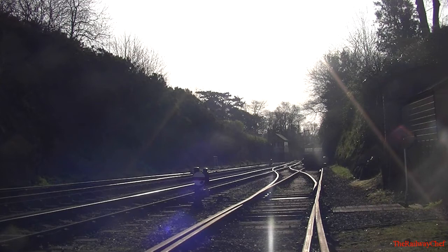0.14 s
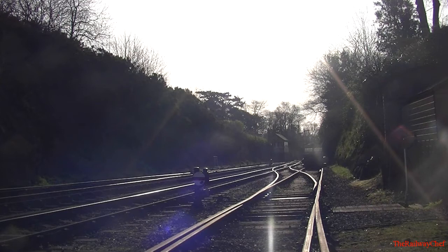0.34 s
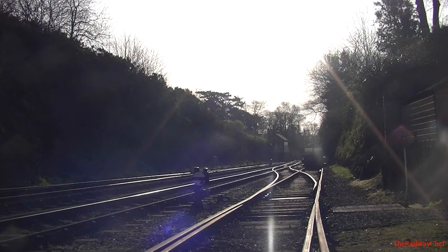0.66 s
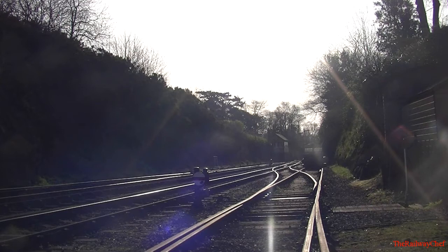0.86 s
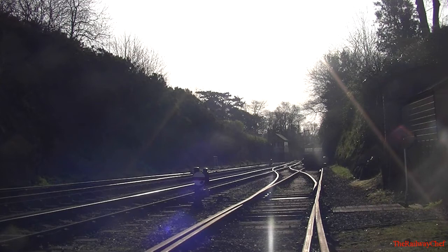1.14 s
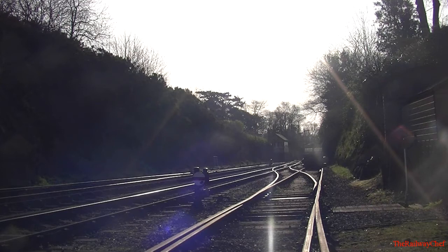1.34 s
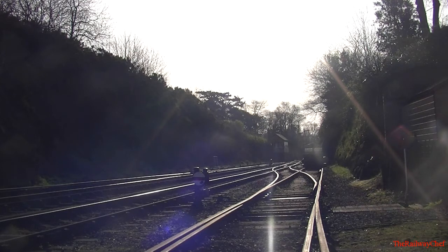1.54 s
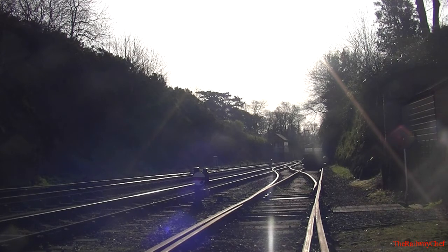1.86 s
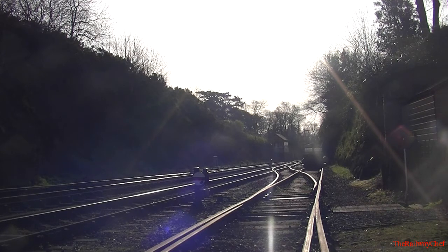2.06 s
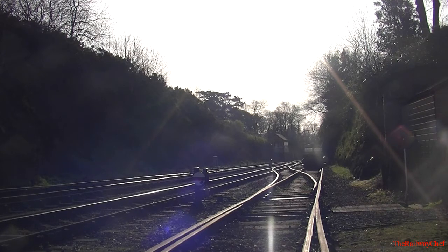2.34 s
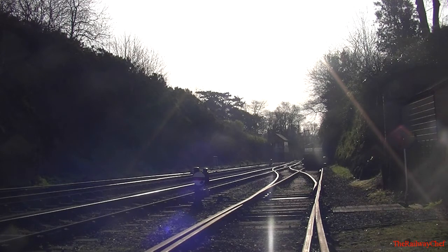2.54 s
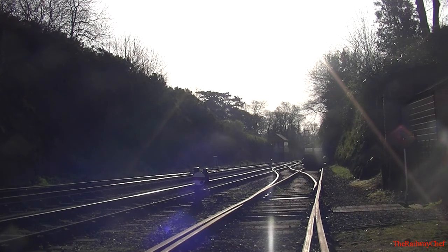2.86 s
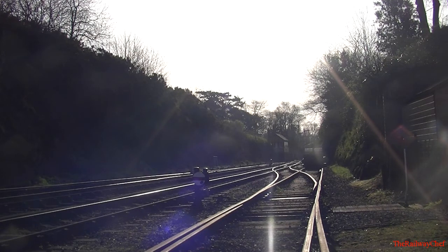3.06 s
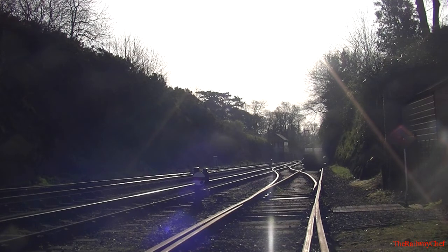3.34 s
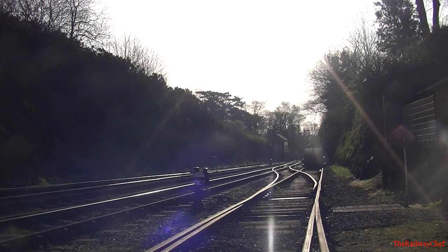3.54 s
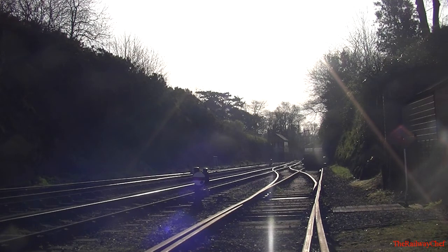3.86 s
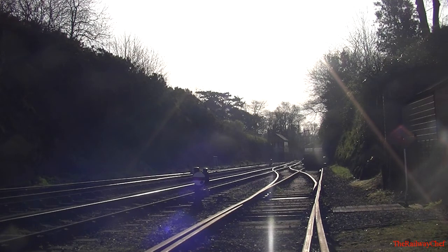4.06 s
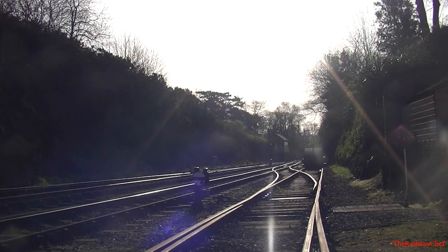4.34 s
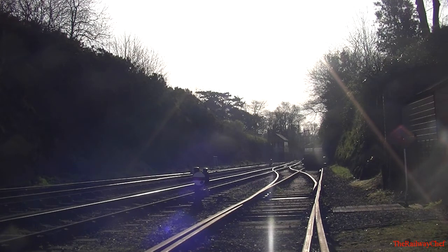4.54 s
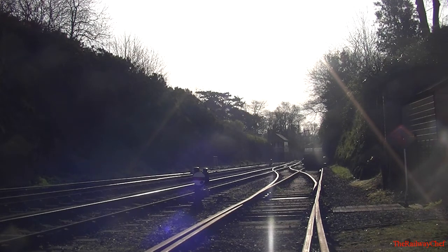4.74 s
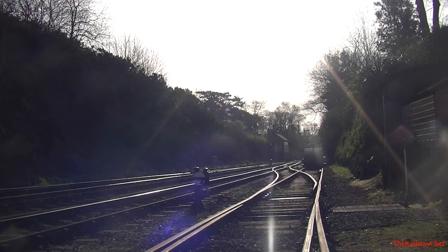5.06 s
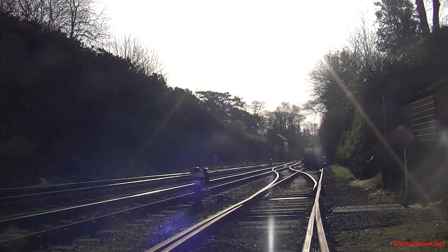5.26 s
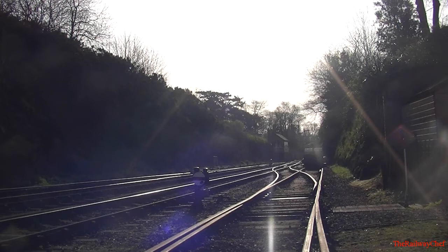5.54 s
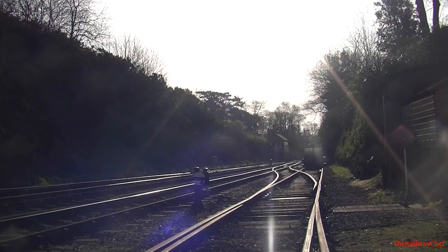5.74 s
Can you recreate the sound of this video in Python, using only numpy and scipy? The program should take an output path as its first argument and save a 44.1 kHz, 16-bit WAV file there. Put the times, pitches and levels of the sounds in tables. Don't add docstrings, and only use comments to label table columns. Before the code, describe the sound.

Harsh bright jets of steam blow, cut off and snap back as a starting steam engine chuffs heavily in a wooded cutting.

```python
import sys
import numpy as np
from scipy import signal
from scipy.fft import rfft, irfft
from scipy.io import wavfile
from scipy.ndimage import uniform_filter1d

SR = 44100
rng = np.random.default_rng(int(sys.argv[2]) if len(sys.argv) > 2 else 0)


def elevation(decibels):
    levels = np.asarray(decibels, float)
    return 10 ** (levels / 20)


def master(y):
    cut = np.clip(np.atleast_2d(y).T, -1, 1)
    pcm = np.round(cut * 32767)
    wavfile.write(sys.argv[1], SR, pcm.astype(np.int16))


N = 260190
SIZE, HOP = 1024, 256
HZ = np.fft.rfftfreq(SIZE, 1 / SR)[:, None]
T = np.arange(N) / SR
SLOW = T[::32]

# f/Hz, left-right level/dB
PORT_LEAN = [(60, 1.0), (110, 3.5), (200, 1), (380, 2), (700, 4.5), (1290, 8), (2380, 0), (4400, 4),
             (8120, 9), (15000, 5)]
# f/Hz, share/1
PORT_COHERENCE = [(30, 0.6), (150, 0.03), (800, 0.57), (2500, 0.39), (7000, 0.66), (12000, 0.22),
                  (16000, 0.6)]
# f/Hz, phase/rad
PORT_LEAD = [(100, 2.6), (1000, 3.5), (2500, 3.97), (6000, 4.46), (12000, 3.8), (16000, 2.7)]
# t/s, delay/us
ROLLING_LEAD = [(0, .1), (2.5, .1), (4, 11), (5.2, 16), (5.9, 45)]

# f/Hz, level/dB per Hz
WASH_COLOUR = [(18, -60), (30, -27), (108, -11.5), (230, -21.5), (332, -17), (532, -10.5), (830, -3),
               (1470, 1.5), (2550, -2.5), (3150, -3), (9430, -6.5), (11600, -13), (15500, -24)]
# f/Hz, share/1
WASH_COHERENCE = [(30, 0.5), (100, 0.27), (300, 0.53), (1000, 0.34), (3000, 0), (12000, 0.3)]
# f/Hz, loss/dB
WASH_RIGHT_LOSS = [(40, 2.0), (200, 4.5), (9000, 8.5)]
WASH_DB = -37
WASH_FOLLOWS, WASH_LAG_S = 0.14, 0.28
NEARING_DB_PER_S = 0.55
# delay t/s, level/dB
BANK_ECHOES = [(.0193, -19), (.027, -19), (.041, -19), (.058, -19), (.083, -20)]

# start t/s, rise t/s, hold t/s, level/dB
GROANS = [
    (0.241, 0.089, 0.13, -54),
    (.56, 0.071, .14, -58),
    (.84, .05, 0.37, -62.5),
    (1.95, 0.089, 0.34, -58.5),
    (3.078, 0.052, 0.078, -55),
    (3.42, 0.027, 0.27, -54.5),
    (3.948, 0.045, 0.074, -62),
    (4.719, 0.13, 0.15, -56),
    (5.22, 0.06, .06, -61),
    (5.62, 0.045, 0.14, -61.5),
]
# f/Hz, level/dB
GROAN_COLOUR = [(60, -24), (120, 0), (180, 0.5), (300, 1), (450, -1), (900, -35), (4000, -70)]

# start t/s, rise t/s, hold t/s, boom level/dB, rasp level/dB
EXHAUST_BEATS = [
    (-0.12, 0.32, 0.067, -39.5, -25.5),
    (1.775, .025, 0.058, -38, -27.5),
    (2.572, 0.32, 0.15, -39.5, -28.5),
    (3.408, 0.079, 0.091, -37, -30),
    (4.974, 0.038, 0.097, -38, -31),
    (5.68, 0.21, .1, -41.5, -27),
]
# start t/s, rise t/s, hold t/s, rasp level/dB
AFTERBLOWS = [
    (0.292, .1, 0.096, -33.5),
    (3.11, 0.052, 0.33, -30),
    (3.51, .08, .1, -30),
    (4.45, .15, 0.023, -33.5),
    (4.998, .012, 0.018, -27),
    (5.118, .05, 0.018, -32),
    (5.203, 0.06, .04, -33.5),
]
# f/Hz, level/dB
BOOM_COLOUR = [(60, -45), (150, -21), (240, -8), (450, -2.5), (800, -1), (1200, -0.5), (2500, -15),
               (8000, -63)]
# f/Hz, level/dB
RASP_COLOUR = [(400, -27), (800, -8.5), (1200, -1.5), (1700, 2.5), (2300, -4.5), (3500, -9.5), (9000, -46)]
# t/s, pitch factor/1
OPENING_PITCH = [(0, .92), (1.8, 0.98), (2.75, 1), (3.05, 0.63), (3.45, 0.91), (3.75, 0.69), (5, 0.8),
                 (5.15, 0.81), (5.26, 0.8), (5.42, 0.84), (5.9, 0.77)]
BOOM_FALL_DB_PER_S, RASP_FALL_DB_PER_S, RASP_LINGER_S, RISE_BEND = 82, 80, 0.057, 2.26
CRACK_DB, CRACK_S, QUICK_S = 4.5, 0.034, 0.052
BOOM_REST_DB, BOOM_UNDER_JET_DB, RASP_UNDER_JET_DB = -54, -27, -6.5
ROLL_DB, ROLL_FALL_DB_PER_S = -20.5, 34
CLIMB, CLIMB_S, SETTLE_S = 0.28, 0.27, 1

# t/s, f/Hz, level over the jet/dB
COCK_MODE = [(0, 9400, -30), (1.76, 9400, -30), (1.81, 8800, -4), (1.92, 8900, -10), (2.5, 8950, -7.5),
             (2.8, 9600, -34), (5.9, 9600, -35)]
# t/s, f/Hz, width/Hz, level over the jet/dB
HOLLOW_MODE = [(0, 2950, 285, 0.5), (.15, 3010, 296, 4.5), (.28, 3070, 400, -7.5), (.45, 3030, 600, -4),
               (.7, 3030, 400, -3.5), (.95, 3040, 250, -6), (1.5, 3040, 174, 0), (1.8, 3090, 200, -7),
               (1.87, 3080, 220, -2), (2.2, 3030, 230, -6), (2.6, 3070, 230, -5), (2.9, 3100, 500, -10.5),
               (3.37, 3084, 1120, -6.5), (3.55, 3240, 457, -8.5), (3.75, 3300, 300, -5),
               (4.1, 3350, 344.3, -7), (4.6, 3660, 450, -13), (5.9, 3840, 700, -13)]
OVERTONE, OVERTONE_WIDTH_HZ = 2.03, 600
OVERTONE_DB, OVERTONE_BY_COCK = -10.5, 0.12

# open t/s, length t/s, first level/dB, last level/dB, treble tilt/dB
STROKE_BLOWS = [
    (-0.3, 1.682, -28.5, -31, 2),
    (1.786, 0.78, -28, -33, 3),
    (2.747, .3, -30, -30, 0.5),
    (3.081, 1.544, -29, -30.5, 4),
    (4.987, 0.77, -27.5, -30.5, 6),
    (5.82, .3, -30, -30, 2),
]
# t/s, level/dB, length t/s
SLUGS = [(.12, -1.5, 0.54), (0.463, 2.5, 0.35), (0.907, -1, .3), (1.218, 1.4, 0.15), (0.782, -1.8, 0.091),
         (1.8, 4, .05), (2.33, 0, .15), (3.364, -0.5, 0.19), (3.625, -1.8, 0.17), (3.704, 1.5, 0.16),
         (4.086, -1.3, 0.063), (4.167, 1.8, 0.048), (4.351, -1.5, 0.19), (4.484, 0.2, 0.15),
         (4.656, 1.5, 0.085), (5.18, 1, 0.031), (5.193, -3.5, .025), (5.224, 1.5, .04)]
# f/Hz, level/dB per Hz
JET_COLOUR = [(180, -88), (300, -21), (527, -38.5), (592, -18), (722, -28.5), (824, -14.5), (1020, -21),
              (1790, -4), (2670, -3), (2950, -2.5), (3840, -2.5), (10000, -11.5), (13500, -18),
              (15700, -25)]
# t/s, left-right level/dB
JET_LEAN = [(0, 5), (.5, 5.5), (1.2, 8), (3, 8), (4.4, 7.5), (5.2, 6.5), (5.9, 3.5)]
# t/s, share/1
BALLAST_ECHO = [(0, 0.042), (1.7, 0.016), (1.85, 0.12), (2.5, 0.079), (2.8, 0.013), (5.9, 0.057)]
BALLAST_HZ = 5200
SNAP_S, SWELL_S, SWELL_DB, SHUT_DB_PER_S = 0.021, 0.17, -7, 62
SHUT_DULL_DB, SHUT_LEAN_DB, SHUT_DEPTH_DB = -9.5, -8.5, 9
SAG_DULL_DB, SAG_DULL_S, OPEN_DULL_DB = -2, 0.14, -2


def evened(x):
    return x / np.sqrt(np.mean(x ** 2) + 1e-20)


def read(points, hz):
    f, value = np.transpose(points)
    return np.interp(np.log(hz + 1), np.log(f + 1), value)


def column(table, t, order):
    rows = np.transpose(table)
    return np.interp(t, rows[0], rows[order])


def fine(control):
    return np.interp(T, SLOW, control)


def turbulence(crackle, flutter_db):
    g, eddies = rng.standard_normal((2, 2, N))
    eddies = evened(0.86 * g + uniform_filter1d(eddies, size=3) + uniform_filter1d(g, size=3))
    spikes = g - crackle * (np.minimum(eddies ** 2, 6.5) - 1)
    flutter = uniform_filter1d(rng.standard_normal(N), 900)
    flutter = evened(uniform_filter1d(flutter, 900))
    return evened(spikes) * elevation(flutter_db * flutter)


def heard(pair, colour_db, lean_db, patchy_db, band_hz, lead=None):
    _, t, (a, b) = signal.stft(pair, SR, nperseg=SIZE, noverlap=SIZE - HOP)
    patches = uniform_filter1d(rng.standard_normal(a.shape), 9, 0)
    patches = evened(uniform_filter1d(patches, 18, 1))
    if lead is None:
        rolling_s = column(ROLLING_LEAD, t, order=1) / 10 ** 6
        lead = read(PORT_LEAD, HZ) + 2 * np.pi * HZ * rolling_s
    share = np.clip(read(PORT_COHERENCE, HZ), 0, 1)
    right = share * np.exp(-1j * lead) * a + np.sqrt(1 - share ** 2) * b
    z = np.array([a * elevation(lean_db(t) / 2), right * elevation(-lean_db(t) / 2)])
    in_band = (HZ[:, 0] > band_hz[0]) & (HZ[:, 0] < band_hz[1])
    still = (z.mean(0) * elevation(colour_db(t[:1])))[in_band]
    rms = np.sqrt(4 / 3 * np.mean(np.sum(abs(still) ** 2, 0)))
    z = z * elevation(colour_db(t) + patchy_db * patches)
    return signal.istft(z, SR, nperseg=SIZE, noverlap=SIZE - HOP)[1][:, :N] / rms


def puff(start, rise, hold, db, fall_db_per_s):
    age = SLOW - start
    late = np.maximum(age - rise, 0)
    crack_db = CRACK_DB * np.exp(-(rise / QUICK_S) ** 4 - late / CRACK_S)
    fall_db = fall_db_per_s * np.maximum(late - hold, 0)
    return elevation(2 * (db + crack_db - fall_db)) * np.clip(age / rise, 0, 1) ** RISE_BEND


def wash():
    pair = rng.standard_normal((2, N))
    hz = np.fft.rfftfreq(N, 1 / SR)
    a, b = rfft(pair) * elevation(read(WASH_COLOUR, hz))
    share = np.clip(read(WASH_COHERENCE, hz), 0, 1)
    right = np.sqrt(1 - share ** 2) * b - share * a
    right = right * elevation(-read(WASH_RIGHT_LOSS, hz))
    both = irfft(np.array([a, right]), N)
    return elevation(WASH_DB) * both / np.std(both.mean(0))


def cutting(x):
    taps = np.zeros(SR // 10)
    taps[0] = 1
    for s, db in BANK_ECHOES:
        taps[round(s * SR)] = elevation(db)
    return signal.oaconvolve(x, taps[None] / np.linalg.norm(taps), axes=1)[:, :N]


def rumble():
    colour = lambda t: read(GROAN_COLOUR, HZ) + 0 * t
    lean = lambda t: 3.8 + 0 * t
    groan = heard(turbulence(0, 0.66), colour, lean, 0.51, [120, 300])
    power = sum(puff(*row, BOOM_FALL_DB_PER_S) for row in GROANS)
    return groan * fine(np.sqrt(power))


def draught(t):
    age = t - np.transpose(EXHAUST_BEATS)[0][:, None]
    age = np.where(age > 0, age, np.inf).min(0)
    climb = CLIMB * (1 - np.exp(-age / CLIMB_S)) * np.exp(-age / SETTLE_S)
    return column(OPENING_PITCH, t, order=1) * (1 + climb)


def chimney(jet_db):
    boom_colour = lambda t: read(BOOM_COLOUR, HZ) + 0 * t
    rasp_colour = lambda t: read(RASP_COLOUR, HZ / draught(t))
    boom_lean = lambda t: 5.5 + 0 * t
    rasp_lean = lambda t: 6.7 + 0 * t
    boom = heard(turbulence(0.39, 0.17), boom_colour, boom_lean, 0.21, [200, 700])
    rasp = heard(turbulence(0.6, 0.62), rasp_colour, rasp_lean, 0.51, [1100, 2200])
    low = elevation(2 * (BOOM_REST_DB + NEARING_DB_PER_S * SLOW)) + elevation(2 * (jet_db + BOOM_UNDER_JET_DB))
    high = elevation(2 * (jet_db + RASP_UNDER_JET_DB))
    for start, rise, hold, boom_db, rasp_db in EXHAUST_BEATS:
        low = low + puff(start, rise, hold, boom_db, BOOM_FALL_DB_PER_S)
        low = low + puff(start, rise, hold, boom_db + ROLL_DB, ROLL_FALL_DB_PER_S)
        high = high + puff(start, rise, hold + RASP_LINGER_S, rasp_db, RASP_FALL_DB_PER_S)
    for row in AFTERBLOWS:
        high = high + puff(*row, RASP_FALL_DB_PER_S)
    return (boom * fine(np.sqrt(low)) + rasp * fine(np.sqrt(high))) * elevation(-3.5)


def cock():
    colour = lambda t: -20 * np.log10(1 + (2 * (HZ - column(COCK_MODE, t, order=1)) / 1200) ** 2)
    lean = lambda t: 13.0 + 0 * t
    song = heard(turbulence(.1, .5), colour, lean, .9, [7000, 12000])
    return song * elevation(column(COCK_MODE, T, order=2))


def hollow():
    def colour(t):
        pitch = column(HOLLOW_MODE, t, order=1)
        width = column(HOLLOW_MODE, t, order=2)
        first = 1 / (1 + (2 * (HZ - pitch) / width) ** 2) ** 2
        second = 1 / (1 + (2 * (HZ - OVERTONE * pitch) / OVERTONE_WIDTH_HZ) ** 2) ** 2
        second_db = OVERTONE_DB + OVERTONE_BY_COCK * column(COCK_MODE, t, order=2)
        second_db = second_db - column(HOLLOW_MODE, t, order=3)
        return 10 * np.log10(first + second * elevation(2 * second_db))
    lean = lambda t: -7.0 + 0 * t
    song = heard(turbulence(0.099, 0.66), colour, lean, 1.0, [2000, 5000], lead=5.25)
    return song * elevation(column(HOLLOW_MODE, T, order=3))


def blowing(t):
    start, length, first_db, last_db, tilt_db = np.transpose(STROKE_BLOWS)[:, :, None]
    age = t - start
    opening = np.clip(1 - age / SWELL_S, 0, 1)
    shut_db = SHUT_DB_PER_S * np.maximum(age - length, 0)
    sag = np.clip((age - SWELL_S) / (length - SWELL_S), 0, 1)
    db = first_db + (last_db - first_db) * sag + SWELL_DB * opening - shut_db
    power = elevation(2 * db) * np.clip(age / SNAP_S, 0, 1) ** 2 + 1e-12
    share = power / power.sum(0)
    closing = np.minimum(shut_db / SHUT_DEPTH_DB, 1)
    ending = np.clip(1 + (age - length) / SAG_DULL_S, 0, 1)
    dull_db = SHUT_DULL_DB * closing + SAG_DULL_DB * ending + OPEN_DULL_DB * opening
    surge_db = sum(gain * np.exp(-(2 * (t - s) / span) ** 2) for s, gain, span in SLUGS)
    level_db = 10 * np.log10(power.sum(0)) + surge_db
    treble_db = (share * (tilt_db + dull_db)).sum(0)
    lean_db = column(JET_LEAN, t, order=1) + SHUT_LEAN_DB * (share * closing).sum(0)
    return level_db, treble_db, lean_db


def jets():
    slope = np.clip(np.log2(HZ / 6000 + 1e-9), 0, 1.1)

    def colour(t):
        echo = column(BALLAST_ECHO, t, order=1) * np.exp(2j * np.pi * HZ / BALLAST_HZ)
        return read(JET_COLOUR, HZ) + slope * blowing(t)[1] + 20 * np.log10(abs(1 + echo))
    lean = lambda t: read(PORT_LEAN, HZ) + blowing(t)[2] - 5.5
    return heard(turbulence(0.33, 0.35), colour, lean, 0.33, [4000, 8000])


def scene():
    jet_db = blowing(SLOW)[0]
    keep = np.exp(-SLOW[1] / WASH_LAG_S)
    late_db = signal.lfilter([1 - keep], [1, -keep], jet_db - jet_db[0])
    wash_db = NEARING_DB_PER_S * (SLOW - SLOW.mean()) + WASH_FOLLOWS * (late_db - late_db.min())
    direct = (jets() + hollow() + cock()) * fine(elevation(jet_db))
    echoing = chimney(jet_db) + wash() * fine(elevation(wash_db - 0.23)) + rumble()
    return direct + cutting(echoing)


def band_limit(x):
    return signal.sosfilt(signal.butter(12, 15790, fs=SR, output="sos"), x)


def record(dry):
    return band_limit(dry)


dry = scene()
out = record(dry)
master(out)
```